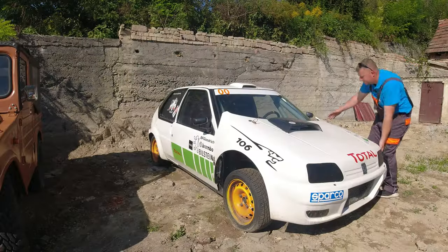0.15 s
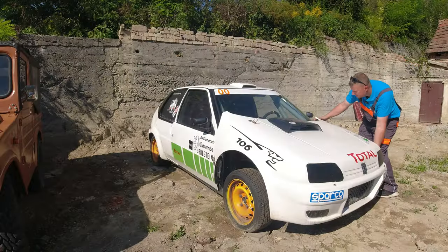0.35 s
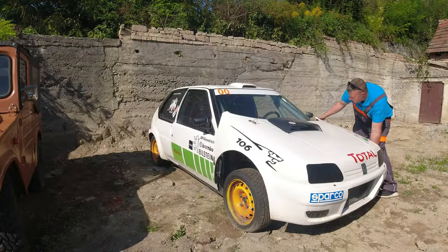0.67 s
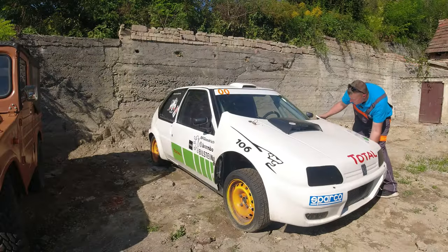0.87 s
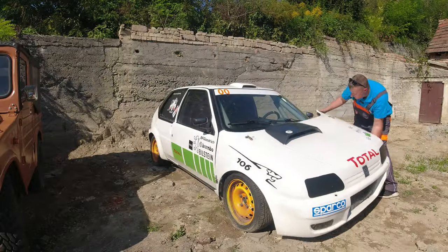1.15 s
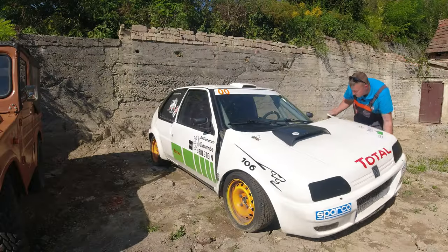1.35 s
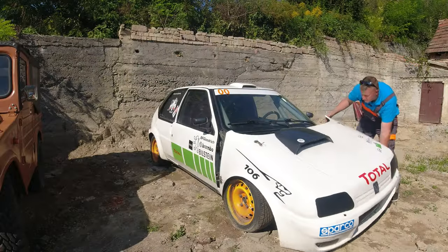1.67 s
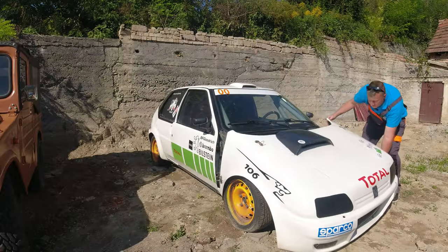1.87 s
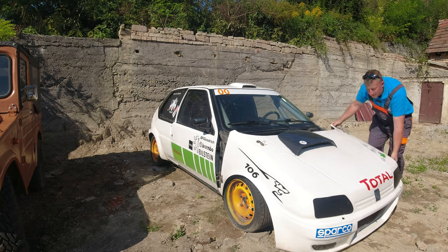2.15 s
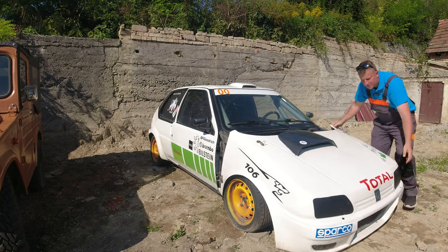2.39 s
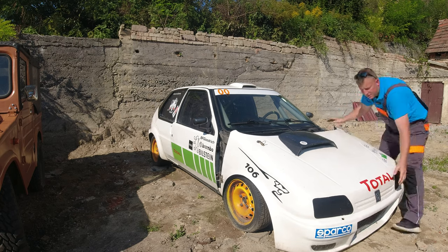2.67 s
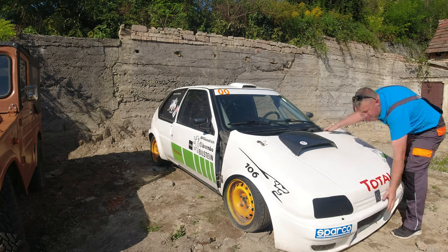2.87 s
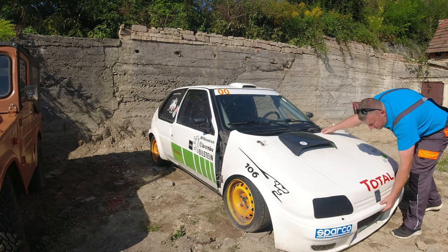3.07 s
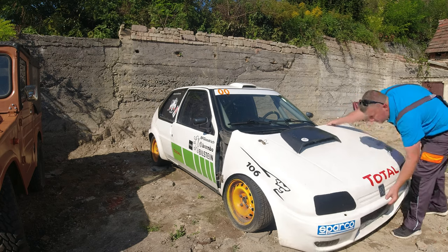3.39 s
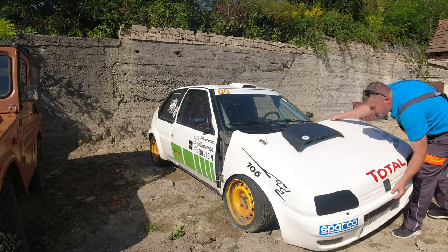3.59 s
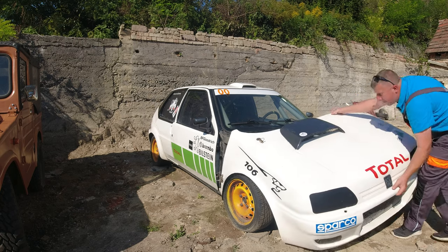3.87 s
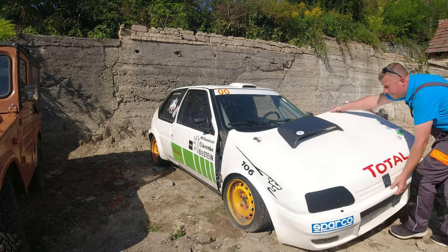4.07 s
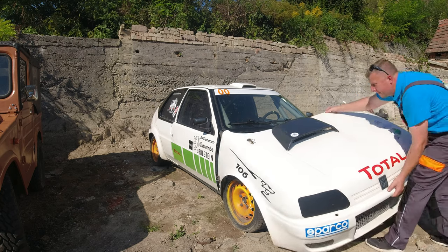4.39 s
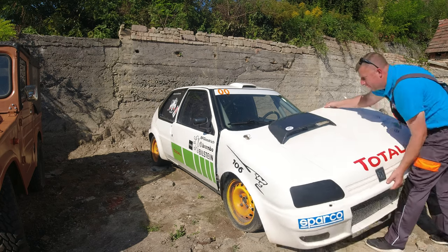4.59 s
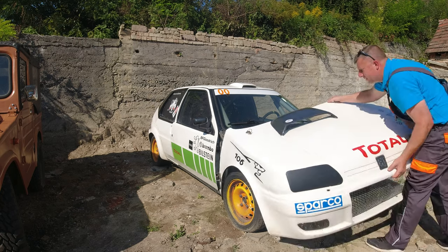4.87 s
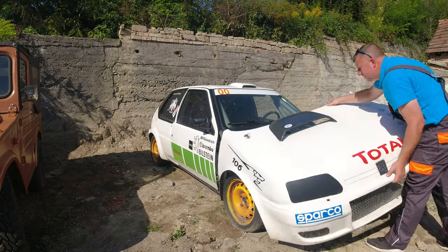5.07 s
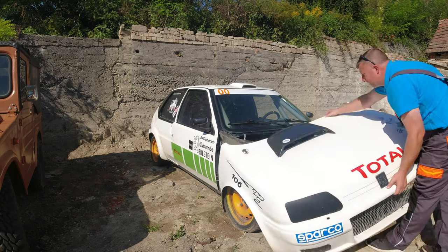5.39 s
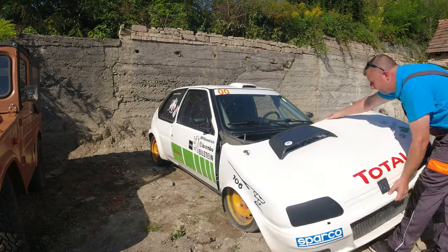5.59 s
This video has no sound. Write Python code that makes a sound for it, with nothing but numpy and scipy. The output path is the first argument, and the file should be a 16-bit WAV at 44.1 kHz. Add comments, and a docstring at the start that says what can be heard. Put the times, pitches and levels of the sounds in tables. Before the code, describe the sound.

A hollow fibreglass car front is handled in a walled yard, heard from a few metres away over a faint outdoor hush. The first second holds only light rubbing and small taps. From about 1 to 2 seconds comes the loudest stretch: the shell is rocked off its pins with dense, booming knocks, rattling, creaking and sharp ticks. Steel pins ring faintly a few times between 1.4 and 2.3 seconds. The knocks thin out to a lull around 2.5 to 3.2 seconds, with tiny squeaks and a soft shoe scuff on dirt. Dragging resumes with gritty scrapes and separate hollow bumps near 3.5, 3.9 and 4.2 seconds. Around 4.7 seconds the panel grates, creaks and squeals briefly, with a thump at 5. A last loud cluster of knocks, ticks and scraping runs from 5.3 to 5.6 seconds, then fades. The walls add a slight, short echo.

```python
"""A hollow one-piece fibreglass car front is rocked off its pins and dragged by hand in a walled yard.
The shell booms when it is knocked; when it rubs, it sticks and slips, so it rumbles, creaks and squeals.
Its edges tick and grate on gritty ground and on steel pins, which ring briefly a few times.
A shoe scuffs the dirt, the walls echo the short sounds, and the outdoor air hushes behind it all.
A small microphone a few metres away brightens the treble, and its limiter holds down the loudest peaks."""
import sys
import numpy as np
from scipy import signal
from scipy.fft import rfft, irfft, next_fast_len
from scipy.io import wavfile
from scipy.ndimage import uniform_filter1d, minimum_filter1d

SR = 44100
rng = np.random.default_rng(int(sys.argv[2]) if len(sys.argv) > 2 else 0)


def wav_record(signal):
    """Record a signal, one row per channel, as 16-bit PCM in the file named by sys.argv[1]."""
    frames = np.transpose(np.atleast_2d(signal))
    bounded = np.clip(frames, -1, 1)
    # unit amplitude maps onto the largest positive 16-bit level
    quanta = np.round(bounded * 32767).astype(np.int16)
    wavfile.write(sys.argv[1], SR, quanta)


N = 253134

# Levels are relative. t60 is the time a sound takes to fade by 60 dB. A mode is a natural ringing tone.
# the hand's pulls, one list a stroke: t/s, shell shaking/dB, edge grating/dB, sliding over grit/dB
STROKES = [
    [(0.0, -35.5, -41, -25.5), (0.068, -64, -69.5, -65), (0.268, -92, -64.5, -56), (0.43, -49, -53.5, -38),
     (0.534, -43, -56.5, -46.5), (0.612, -72, -74, -63), (0.75, -71, -59.5, -54)],
    [(0.76, -59.5, -69, -65.5), (0.954, -28.5, -55, -44), (0.984, -18, -36.5, -29.5),
     (1.126, -4.5, -29.5, -26), (1.182, -15.5, -35, -38), (1.2, -6.5, -23, -12.5),
     (1.28, -15.5, -42, -38.5)],
    [(1.315, -15, -26.5, -23.5), (1.479, -14, -42, -29), (1.537, -11, -28, -22), (1.635, -23.5, -45, -42)],
    [(1.671, -14, -27.5, -29), (1.797, -16, -38.5, -37.5), (1.851, -19.5, -33.5, -44),
     (1.979, -30, -46, -38), (2.029, -22.5, -45, -33), (2.185, -31.5, -57, -50.5), (2.269, -29, -47, -41.5),
     (2.36, -43.5, -50.5, -48), (2.5, -60, -72, -63)],
    [(2.61, -55.5, -71, -63), (2.746, -43.5, -52.5, -52.5), (2.864, -40.5, -54, -47),
     (2.95, -42, -50.5, -44), (3.072, -36.5, -48, -34.5), (3.16, -42, -58, -50)],
    [(3.197, -48, -35.5, -31), (3.301, -26.5, -44, -39), (3.325, -30, -62, -46), (3.347, -32, -42.5, -43),
     (3.5, -30, -45, -41)],
    [(3.543, -14.5, -30, -29.5), (3.705, -41, -48.5, -43.5), (3.861, -41, -50, -37.5),
     (3.901, -16, -31.5, -37), (3.941, -37.5, -50.5, -39.5), (4.05, -47, -64, -46)],
    [(4.069, -42, -47, -39.5), (4.179, -20, -32, -27), (4.211, -27, -44, -41), (4.281, -40, -51, -36),
     (4.347, -25.5, -40, -30.5), (4.513, -37, -44, -42), (4.58, -37, -51, -47)],
    [(4.619, -24, -39, -38.5), (4.673, -14.5, -17.5, -46), (4.693, -12, -28.5, -44),
     (4.727, -9, -23.5, -41), (4.82, -31, -30.5, -41.5), (4.96, -48, -69, -54.5)],
    [(5.002, -26, -33, -46), (5.1, -39.5, -58, -47.5), (5.235, -46.5, -45.5, -52.5)],
    [(5.291, -14.5, -23, -32.5), (5.4, -15.5, -33.5, -23.5), (5.507, -20, -29, -37),
     (5.551, -14, -29.5, -21.5), (5.623, -32.5, -40.5, -43), (5.645, -22, -31, -35.5),
     (5.74, -43, -62, -52)],
]
# the hollow shell's modes: f/Hz, width/Hz, level/dB
SHELL_MODES = [(105.3, 24, -5.5), (157, 38, -3.5), (235.2, 56, -2), (291, 42, -1.5), (347.3, 35.4, -1.5),
               (438.6, 55.5, -5.5), (520.4, 53.4, -6.5), (632.5, 64, -6), (791, 85, -13), (877, 79, -7.5),
               (1134, 170, -12), (1420, 140, -30.5)]
# the edge's creaking modes: f/Hz, width/Hz, level/dB
CREAK_MODES = [(837, 203, 11.5), (1149, 117, 13.5), (1365, 83, -3), (1685, 520, 0)]
# tone colour of the grating edge: f/Hz, level/dB
EDGE_SPECTRUM = [(1100, 14), (1800, 11.5), (2300, 9), (2900, 6.5), (3400, 3.5), (4500, -8), (7000, -23),
                 (12000, -53)]
# tone colour of the crushed grit: f/Hz, level/dB
GRIT_SPECTRUM = [(2500, -4.5), (4500, -3.5), (6200, -4), (8500, -5.5), (9500, -8.5), (11000, -13.5),
                 (13000, -14), (16000, -17.5)]
# dull blows on the shell: t/s, level/dB, panel f/Hz, panel t60/s
KNOCKS = [(0.303, -44.5, 578, 0.14), (0.348, -32, 840, 0.037), (0.374, -40.5, 507, 0.17),
          (0.409, -30.5, 195, 0.14), (0.457, -36, 310, 0.11), (0.629, -30, 815, .04),
          (0.811, -41.5, 318, 0.16), (0.872, -36, 500, 0.055), (0.925, -37, 294, .1),
          (0.967, -20.5, 300, 0.11), (0.984, -11, 403, 0.21), (1.031, -9, 430, 0.14),
          (1.083, -3.5, 652, 0.038), (1.108, -9, 238, 0.3), (1.188, -17, 250, 0.042),
          (1.295, -7, 335, 0.26), (1.333, -12, 260, 0.069), (1.405, -2, 346, 0.14),
          (1.424, -16.5, 332, .04), (1.488, -5.5, 242, 0.13), (1.514, -4.5, 378, 0.14),
          (1.593, -16, 333, 0.22), (1.66, -1.5, 560, 0.047), (1.73, -6, 262, 0.17), (1.78, -15, 269, .09),
          (1.829, -1.5, 520, 0.047), (2.032, -4, 440, 0.039), (2.077, -16, 467, 0.17),
          (2.201, -25.5, 537, 0.2), (2.262, -22.5, 521, 0.19), (2.518, -16.5, 263, 0.14),
          (2.77, -16.5, 415, 0.14), (2.919, -28, 177, 0.059), (2.981, -26.5, 877, 0.18),
          (2.995, -29.5, 106, 0.23), (3.196, -27.5, 703, 0.26), (3.262, -27, 111, 0.13),
          (3.29, -15.5, 507, 0.045), (3.302, -18, 505, 0.093), (3.425, -21.5, 373, .24),
          (3.513, -11, 210, 0.067), (3.531, -6, 262, .08), (3.579, -14.5, 356, 0.079),
          (3.897, -16, 254, 0.073), (4.024, -38.5, 676, 0.12), (4.075, -23.5, 370, 0.066),
          (4.137, -16.5, 233, 0.067), (4.173, -12.5, 270, 0.11), (4.2, -20, 107, .25),
          (4.344, -23, 254, .09), (4.354, -21, 1280, 0.043), (4.421, -21.5, 182, 0.051),
          (4.481, -21, 220, 0.057), (4.497, -24, 920, 0.039), (4.623, -18.5, 330, 0.27),
          (4.663, -16, 484, 0.092), (4.729, -7.5, 235, 0.22), (4.796, -9.5, 477, 0.1),
          (4.977, -9, 204, 0.087), (5.246, -27, 490, 0.13), (5.286, -3.5, 370, 0.084),
          (5.361, -3.5, 226, .064), (5.4, -7, 604, 0.12), (5.53, -8, 230.6, 0.25), (5.553, -22, 250, 0.14),
          (5.635, -29, 209, 0.06)]
# hard ticks of the edge: t/s, level/dB, middle band offset/dB, top band offset/dB
TICKS = [(0.319, -26, -13, -16), (0.627, -18, -17.5, -38), (0.811, -29, -15, -13), (0.9682, -28, -10, -24),
         (0.986, -22.5, -11, -9), (1.043, -21, 3, -13), (1.072, -7, -13, -5), (1.1097, -1.5, -10, -4.5),
         (1.121, -12, -5, -15), (1.1508, -12, -6.5, -25), (1.1902, -3, -6.5, -28), (1.201, -5, -23, -25),
         (1.2174, 2, -24, -16), (1.2397, -2.5, -12.5, -7.5), (1.2924, -14.5, -4, -28),
         (1.318, -16.5, 5, -22), (1.3294, -2.5, -15, -11), (1.3378, -8, -7, -3), (1.378, -13.5, -5, -2),
         (1.3837, -5, -11, -22), (1.4027, -4, -10, -20), (1.4264, -3, -13.5, -14), (1.4822, -10.5, -4, -22),
         (1.5061, -5, -9.5, -15), (1.5289, 2, -22, -12.5), (1.5402, -10.5, -12.5, -29),
         (1.549, -6, -13, -23.5), (1.5721, -11.5, 0.5, -31), (1.6359, -11, -27, -11),
         (1.662, -19.5, 2, -20), (1.6746, 1.5, -19.5, -18), (1.686, 0.5, -20, -40),
         (1.731, -2, -12.5, -10.5), (1.7852, -17.5, -10, -22), (1.8104, -18, -5, -12),
         (1.8422, 0.5, -23, -16), (1.8764, -5.5, -1, -35), (1.8943, 0, -24, -22), (2.0319, -16.5, 6.5, -7),
         (2.055, -28, -2, -4), (2.073, -21, -5.5, -13), (2.0863, -18, -9, -12), (2.135, -34, -15, -6),
         (2.1982, -16, 2, -17), (2.255, -31.5, 8, -28), (2.2727, -21, -27, -13), (2.2867, -19, -19, -6),
         (2.3986, -24.5, -17.5, -13), (2.5233, -19, -11, -16), (2.7774, -28, -5, -15),
         (3.3392, -21.5, -9, -10), (3.427, -17.5, -21, -19), (3.5135, -9, -21, -28),
         (3.535, -1, -22.5, -28), (3.56, -8.5, -14, -14), (3.618, -20, -10, -9), (3.6286, -18, -10, -17),
         (3.685, -34.5, 5, -25), (3.895, -18.5, -10, -26), (4.145, -30, 1, -16), (4.1693, -6.5, -9.5, -14),
         (4.2233, -22, -21, -32), (4.2875, -19.5, -13, -27), (4.35, -20.5, 3, -25), (4.4257, -26, -19, -10),
         (4.499, -16.5, -8.5, -22), (4.6638, -15, -19, -21), (4.7125, -28.5, 11, -25),
         (4.7346, -19, 5.5, -32), (4.804, -38, 15.5, -20), (4.976, -19, -6.5, -16),
         (5.253, -13, -10.5, -21), (5.285, -20, 8.5, -34), (5.334, -20.5, 1, -23), (5.3434, -13, -11, -9),
         (5.3654, -8, -11, -19), (5.376, -9, -10, -26), (5.402, -11.5, -11, -25), (5.4163, -7, -17, -12),
         (5.431, -6.5, -22, -22), (5.4615, -12.5, -12, -13), (5.505, -11, -10, -15), (5.529, -4, -14, -29),
         (5.551, -6.5, -10.5, -19), (5.5783, -15, -29, -39), (5.633, -26, 0, -20), (5.658, -9, -17, -20),
         (5.721, -26, -20, -31)]
# hits that leave a pin ringing: t/s, level/dB, boost of its lowest mode/dB
PINGS = [(1.429, -32, -7), (1.53, -36, -2), (1.877, -28.5, -18), (2.033, -35, 4), (2.196, -37, -6),
         (2.258, -44.5, 25)]
# the steel pin's modes: f/Hz, level/dB, t60/s
PIN_MODES = [(2800, 0, .03), (7850, -3, .13), (8380, 0, .15), (10900, -8, .05)]
# squeals, each sounding for 80% of its span: t/s, span/s, f/Hz, level/dB, octave offset/dB
SQUEALS = [(2.945, 0.022, 905, -35.5, -37), (2.98, 0.026, 940, -33.5, -32), (3.025, 0.048, 920, -39.5, -30),
           (4.61, 0.067, 1120, -28, -9.5), (4.645, 0.041, 307, -18, -16), (4.658, 0.041, 520, -17.5, -22),
           (4.7, 0.04, 1410, -25, -2.5), (4.725, 0.036, 250, -17, 3), (4.73, 0.094, 506, -23, -34),
           (4.765, 0.095, 1500, -39, -27), (3.55, 0.046, 2300, -35.5, -30), (3.53, 0.025, 1800, -36, -25),
           (3.33, .12, 620, -38, -17), (5.47, 0.016, 2040, -30.5, -28), (5.515, 0.03, 1960, -29.5, -28)]
# shoe scuffs: t/s, fade time/s, centre f/Hz, level/dB
SCUFFS = [(2.999, 0.11, 11400, -50.5), (3.177, 0.09, 3400, -31), (3.189, 0.085, 6250, -38.5),
          (4.064, 0.11, 3630, -42), (4.29, .09, 11400, -48)]
# how long the yard echoes: f/Hz, t60/s
YARD_DECAY = [(100, 0.48), (600, 0.073), (3000, 0.057), (10000, 0.014)]
# tone colour of the outdoor hush: f/Hz, level/dB
AIR_SPECTRUM = [(25, -15), (100, -70), (300, -11), (550, 7.5), (1200, -11), (2500, -10), (5000, -12.5),
                (9000, -18), (16000, -14)]
# the microphone's treble resonances: f/Hz, width/Hz, level/dB
MIC_PEAKS = [(7510, 1300, 15), (10430, 430, -7)]


def rubbing():
    """Sticking and slipping shakes the shell, makes the edge creak and grate, and crushes grit."""
    times, *levels = np.concatenate(STROKES).T
    shake_db, grate_db, grit_db = [np.interp(np.arange(N) / SR, times, db) for db in levels]
    rumble_db = add_rattle(shake_db)
    creak_db = 0.57 * rumble_db + 0.58 * grate_db - 0.5
    shake = slips(per_s=80, life_s=0.0036, spread_db=3, share=0.57)
    rumble = unit(filtered(shake, modes(SHELL_MODES)))
    creak = unit(filtered(shake, lambda f: modes(CREAK_MODES)(f) * resonance(f, 1086, 1350)))
    judder = np.clip((rumble_db + 48.5) / 30, 0.12, 0.8)  # hard shaking jerks, a light touch glides
    edge_slips = slips(per_s=150, life_s=0.0025, spread_db=5, share=judder)
    grit_slips = slips(per_s=200, life_s=0.002, spread_db=5, share=judder)
    grate = coloured(edge_slips, EDGE_SPECTRUM)
    grit = coloured(grit_slips, GRIT_SPECTRUM)
    flex = unit(filtered(rng.standard_normal(N), lambda f: resonance(f, 84.5, 91) ** 2))  # shell bends
    body = amp(rumble_db - 4.5) * rumble + amp(creak_db) * creak + amp(0.83 * rumble_db - 13.5) * flex
    return body + amp(grate_db) * grate + amp(grit_db - 12) * grit


def slips(per_s, life_s, spread_db, share):
    """Each slip is a burst of noise that swells fast and dies away; share=0 gives an even slide."""
    chance, size = rng.random(N), rng.uniform(-1, 1, N)
    starts = (chance < per_s / SR) * amp(spread_db * size)
    fade = [1, -np.exp(-1 / (life_s * SR))]
    bursts = signal.lfilter([1], fade, signal.lfilter([1], fade, starts))
    return (share * unit(bursts) + 1 - share) * rng.standard_normal(N)


def add_rattle(shake_db, kick_db=-11.5, fade_db_per_s=254):
    """Each blow leaves the loose shell rattling, which briefly raises its shaking level."""
    times, blow_db = np.transpose(KNOCKS)[:2]
    kicks = np.bincount(np.round(times * SR).astype(int), amp(blow_db + kick_db) ** 2, N)
    fade = amp(-fade_db_per_s / SR) ** 2
    rattle_power = signal.lfilter([1], [1, -fade], kicks)
    return 10 * np.log10(amp(shake_db) ** 2 + rattle_power)


def knocks():
    """A blow rings the struck panel and the modes near its pitch, and bends the whole shell in a thud."""
    out, t = np.zeros(N + SR), np.arange(SR // 4) / SR
    mode_hz, _, mode_db = np.transpose(SHELL_MODES)
    draws = rng.standard_normal((len(KNOCKS), 2, len(SHELL_MODES)))
    for (start, db, panel_hz, t60), (vary, detune) in zip(KNOCKS, draws):
        ring_db = 0.067 * mode_db - 13 * np.abs(np.log2(mode_hz / panel_hz)) + 3.6 * vary
        ring_t60 = t60 * (panel_hz / mode_hz) ** 0.3 + 0.001  # low modes last longer
        ring_hz = mode_hz * (1 + 0.085 * detune)
        ring = sum(fading_tone(t, *mode) for mode in zip(ring_hz, ring_db, ring_t60))
        ring += 1.18 * fading_tone(t, panel_hz, 0, t60 + 0.0012)
        ring *= 1 - np.exp(-t / 0.00054)  # soft contact
        thud_db = -19 - 0.3 * db - 10 * np.log2(panel_hz / 300)  # a bigger share in light, low blows
        thud = fading_tone(t, 82 * (1 + 0.15 * detune[0]), thud_db, t60=0.22) * (1 - np.exp(-t / 0.003))
        add_at(out, start, amp(db + 1.5) * (ring / np.abs(ring).max() + thud))
    return out[:N]


def ticks():
    """The edge hits something hard: a sharp crack and a short rattle, in three bands of noise."""
    t = np.arange(SR // 6) / SR
    shape = (amp(-60 * t / 0.0063) + 0.14 * amp(-60 * t / 0.043)) * (1 - np.exp(-t / 0.0019))
    middle, high, top = np.zeros((3, N + SR))
    for start, db, middle_db, top_db in TICKS:
        for band, offset_db in (middle, middle_db), (high, 0), (top, top_db):
            add_at(band, start, amp(db + offset_db) * shape * rng.standard_normal(len(t)))
    middle = filtered(middle, lambda f: resonance(f, 2650, 2850) ** 2
                      * (0.7 + 0.5 * resonance(f, 2800, 410)))
    high = filtered(high, lambda f: resonance(f, 7400, 3700) ** 3
                    * (0.69 + 0.51 * resonance(f, 7600, 700)))
    top = filtered(top, lambda f: resonance(f, 10430, 4000) ** 2
                   * (0.5 + 1.29 * resonance(f, 10830, 900)))
    return (amp(18) * middle + amp(-1) * high + amp(9.5) * top)[:N]


def pings():
    """A steel pin rings briefly after a few of the contacts."""
    out, t = np.zeros(N + SR), np.arange(SR // 4) / SR
    for start, db, boost_db in PINGS:
        ring = sum(fading_tone(t, hz, level + boost_db * (hz < 6000), t60)
                   for hz, level, t60 in PIN_MODES)
        add_at(out, start, amp(db - 8.5) * ring)
    return out[:N]


def squeals():
    """Regular sticking and slipping sings a short, wavering note with its octave."""
    out = np.zeros(N + SR)
    draws = rng.standard_normal((len(SQUEALS), 2, SR // 5))
    for (start, span, hz, db, octave_db), noises in zip(SQUEALS, draws):
        n = round(span * SR * 0.8)
        drift, flutter = [unit(uniform_filter1d(noise, size=200))[:n] for noise in noises]
        phase = 2 * np.pi * np.cumsum(hz * (1 + 0.027 * drift)) / SR
        note = np.sin(phase) + amp(octave_db) * np.sin(2 * phase)
        add_at(out, start, amp(db + 6.5 + 2.63 * flutter) * note * np.sqrt(np.hanning(n)))
    return out[:N]


def scuffs():
    """A shoe scrapes the dirt: a hiss that starts fast and trails off."""
    out = np.zeros(N + SR)
    for start, fade_s, hz, db in SCUFFS:
        t = np.arange(round(2 * fade_s * SR)) / SR
        hiss = unit(filtered(rng.standard_normal(SR // 2), lambda f: resonance(f, hz, 0.28 * hz) ** 2))
        shape = amp(db - 16.5 * (t / fade_s) ** 2) * (1 - np.exp(-t / 0.015))
        add_at(out, start, shape * hiss[:len(t)])
    return out[:N]


def yard_echo(x):
    """The walls throw the sound back a moment later; low tones linger longest."""
    hz, t, spectrum = signal.stft(rng.standard_normal(SR // 3), SR, nperseg=256)
    fade = amp(-60 * t / value_at(YARD_DECAY, hz)[:, None])
    tail = signal.istft(spectrum * fade, SR, nperseg=256)[1]
    return signal.fftconvolve(np.pad(x, (500, 0)), tail / np.linalg.norm(tail))[:N]


def air():
    """The quiet, steady outdoor hush."""
    return amp(-61.5) * coloured(rng.standard_normal(N), AIR_SPECTRUM)


def amp(db):
    """Turn decibels into a multiplier."""
    return 10 ** (np.asarray(db) / 20)


def unit(x):
    """Scale x to an average strength (rms) of 1."""
    return x / np.sqrt(np.mean(x ** 2) + 1e-20)


def add_at(track, start_s, sound):
    """Mix a sound into a track at the given time."""
    track[round(start_s * SR):][:len(sound)] += sound


def fading_tone(t, hz, db, t60):
    """A pure tone that dies away."""
    return amp(db - 60 * t / t60) * np.sin(2 * np.pi * hz * t)


def value_at(points, hz):
    """Read between a table's points on a logarithmic frequency scale."""
    f, values = np.transpose(points)
    return np.interp(np.log(hz + 1), np.log(f + 1), values)


def filtered(x, response):
    """Scale and shift each frequency f in x by response(f)."""
    size = next_fast_len(x.shape[-1] + 8192)
    return irfft(rfft(x, size) * response(np.fft.rfftfreq(size, 1 / SR)), size)[..., :x.shape[-1]]


def coloured(noise, spectrum):
    """Give noise a table's tone colour, at strength 1."""
    return unit(filtered(noise, lambda f: amp(value_at(spectrum, f))))


def resonance(f, hz, width_hz):
    """A filter peak that passes hz fully and weakens the rest."""
    return 1j * f * width_hz / (hz * hz - f * f + 1j * f * width_hz)


def modes(table):
    """A filter with one peak a row, added with alternating signs."""
    return lambda f: sum((-1) ** k * amp(db) * resonance(f, hz, width)
                         for k, (hz, width, db) in enumerate(table))


def scene():
    """The short sounds echo in the yard, over the rubbing and the hush."""
    hits = knocks() + ticks() + pings() + squeals() + scuffs()
    return (hits + amp(-15) * yard_echo(hits) + rubbing() + air())[None]


def record(dry, bass_cut_hz=38, ceiling=0.97, top_hz=15800):
    """The microphone lifts the treble, thins the deep bass, limits peaks and cuts the very top."""
    x = filtered(dry, lambda f: (1 + sum(amp(db) * resonance(f, hz, w) for hz, w, db in MIC_PEAKS))
                 * (1j * f / (bass_cut_hz + 1j * f)) ** 6)
    needed_gain = np.minimum(1, ceiling / (np.abs(x) + 1e-9))
    smooth_gain = uniform_filter1d(minimum_filter1d(needed_gain, size=49), size=25)
    return filtered(x * smooth_gain, lambda f: 1 / (1 + (f / top_hz) ** 120))


dry = scene()
out = record(dry)
wav_record(out)
```